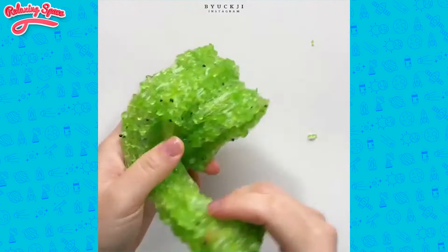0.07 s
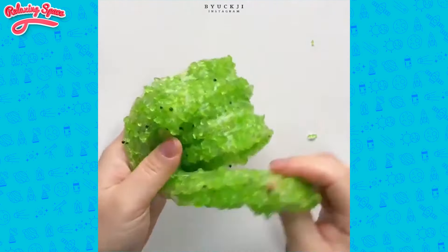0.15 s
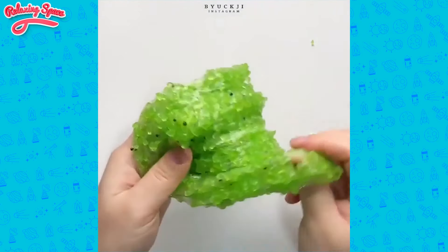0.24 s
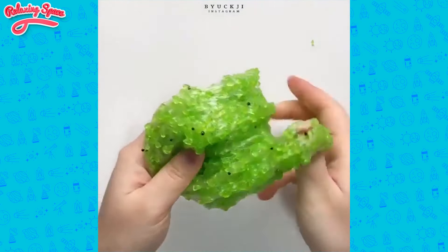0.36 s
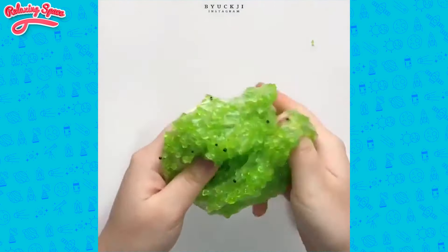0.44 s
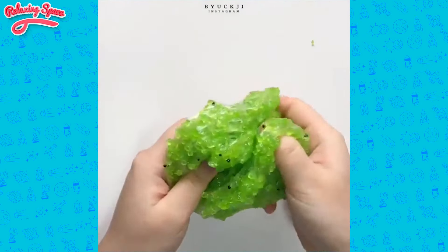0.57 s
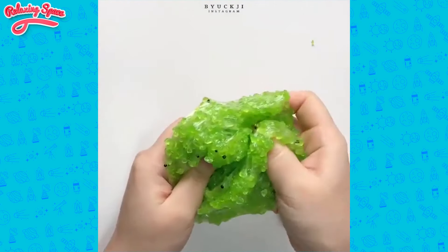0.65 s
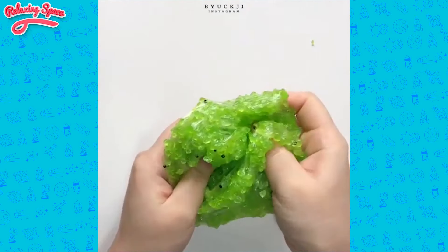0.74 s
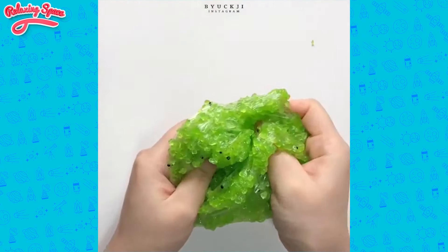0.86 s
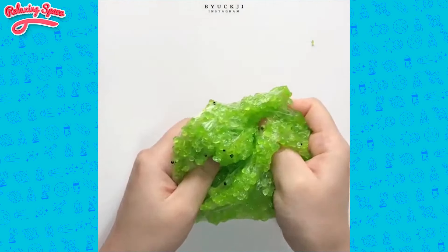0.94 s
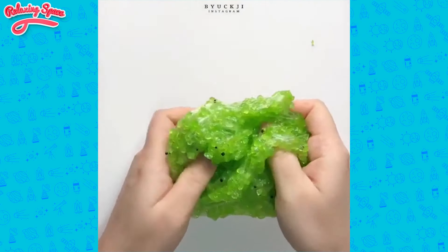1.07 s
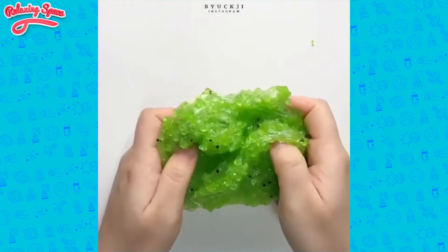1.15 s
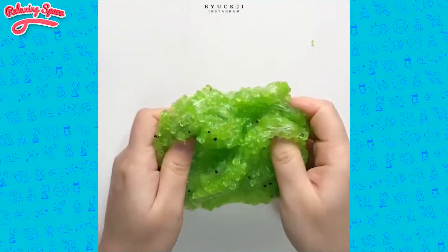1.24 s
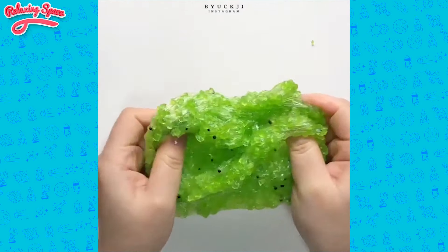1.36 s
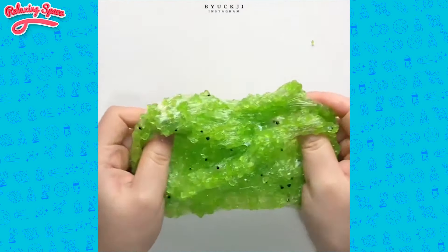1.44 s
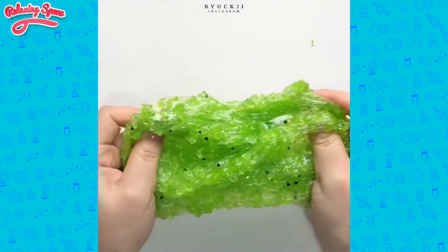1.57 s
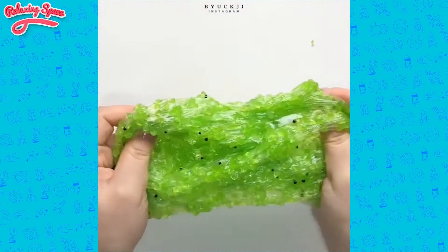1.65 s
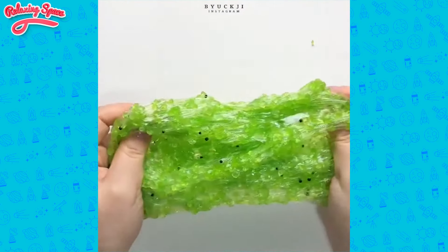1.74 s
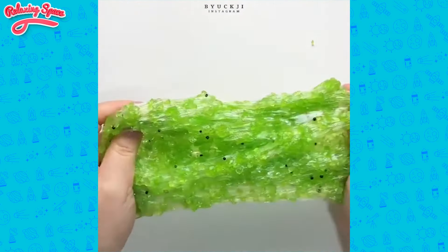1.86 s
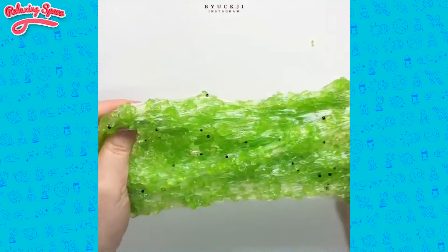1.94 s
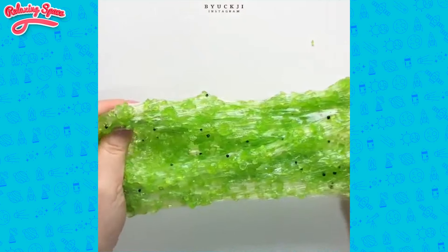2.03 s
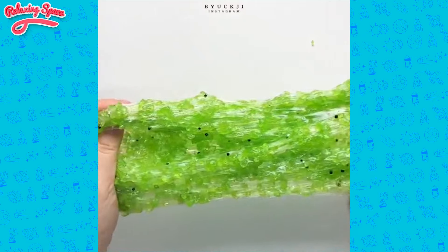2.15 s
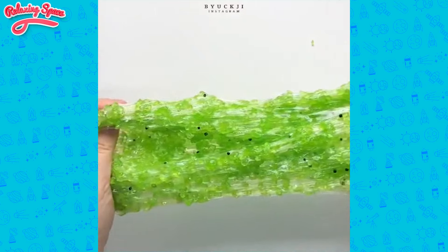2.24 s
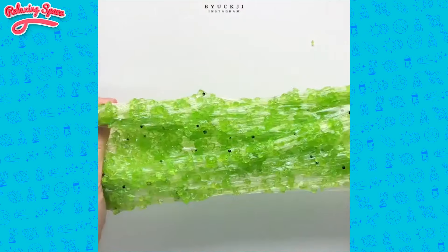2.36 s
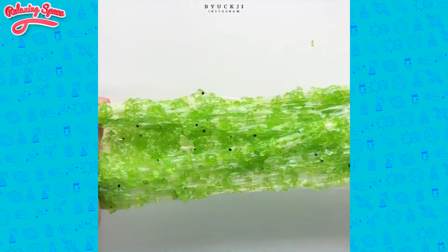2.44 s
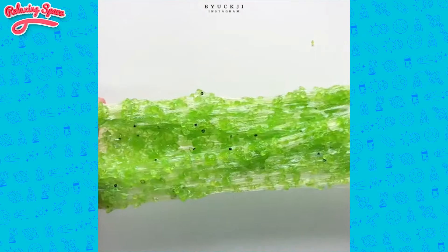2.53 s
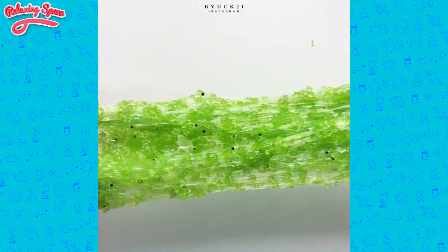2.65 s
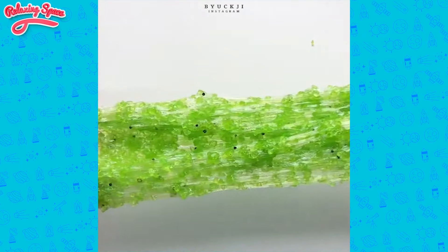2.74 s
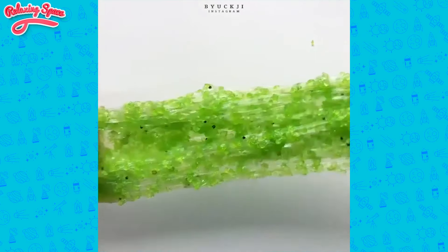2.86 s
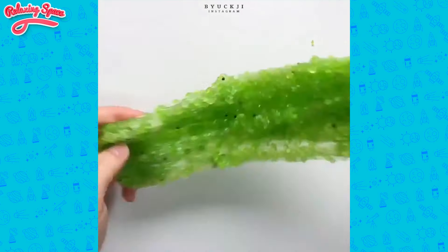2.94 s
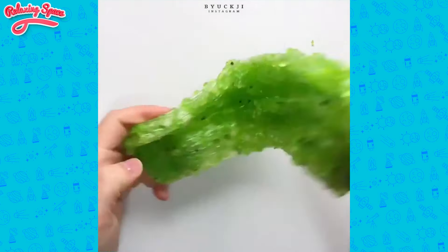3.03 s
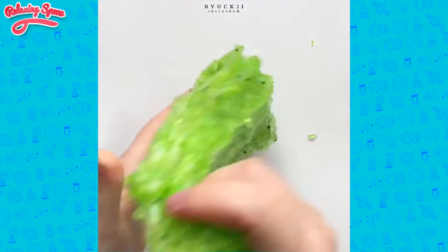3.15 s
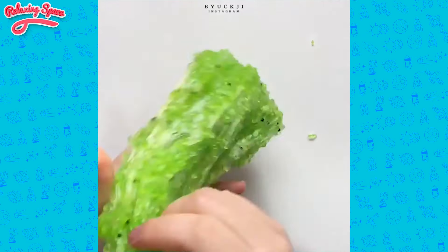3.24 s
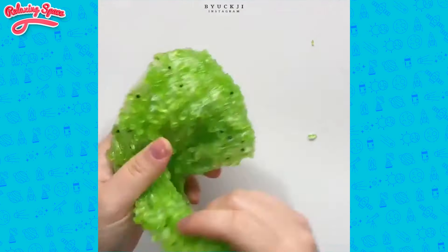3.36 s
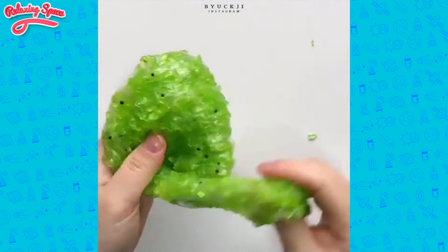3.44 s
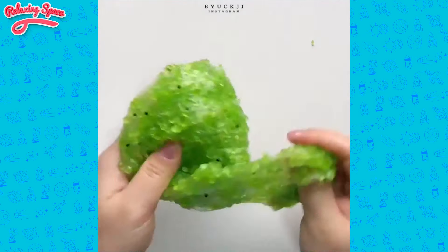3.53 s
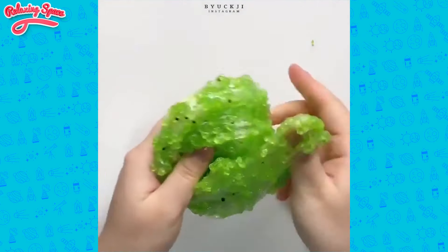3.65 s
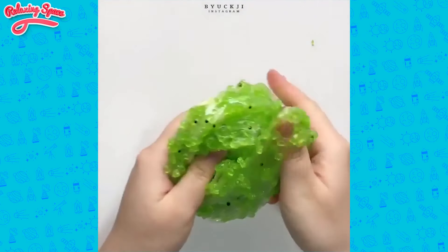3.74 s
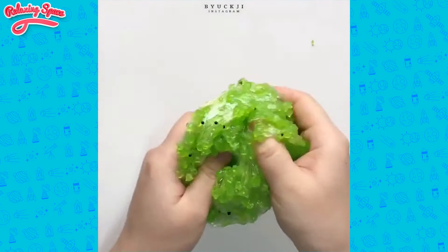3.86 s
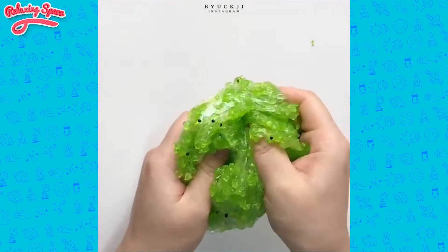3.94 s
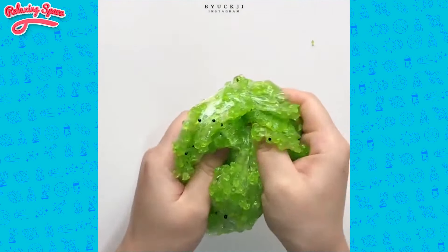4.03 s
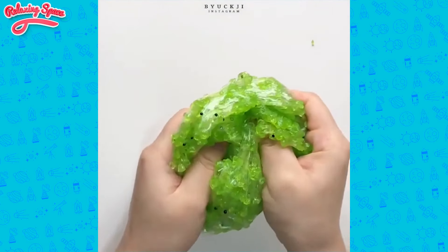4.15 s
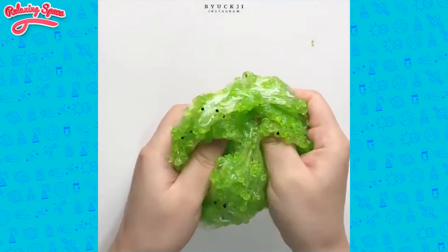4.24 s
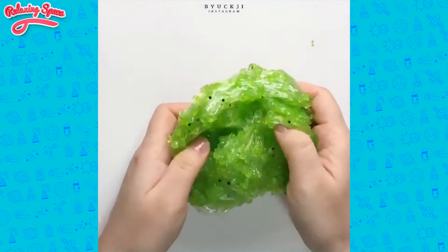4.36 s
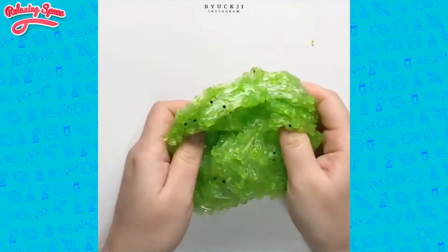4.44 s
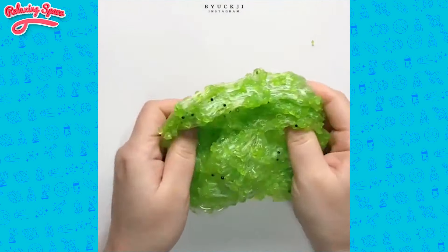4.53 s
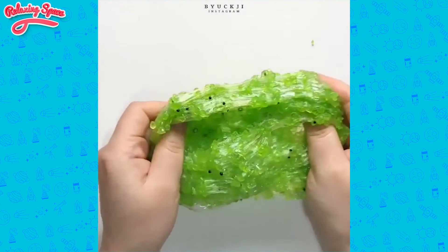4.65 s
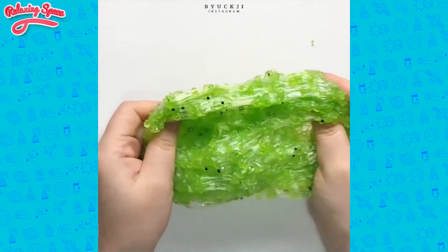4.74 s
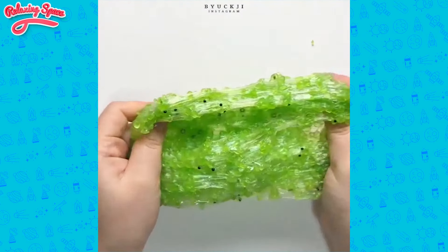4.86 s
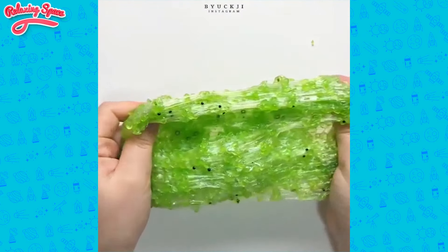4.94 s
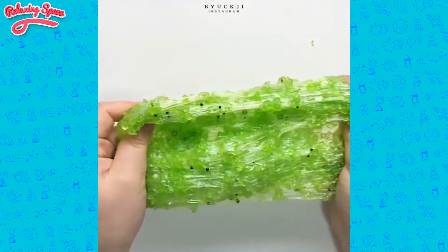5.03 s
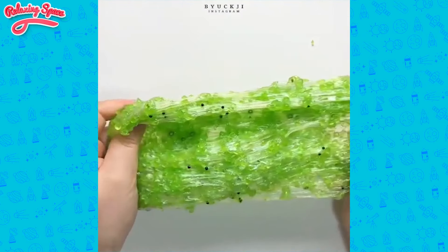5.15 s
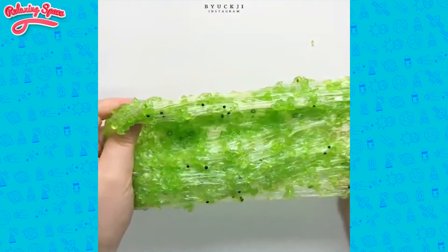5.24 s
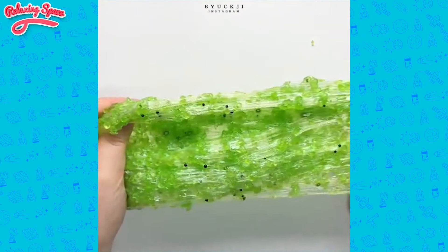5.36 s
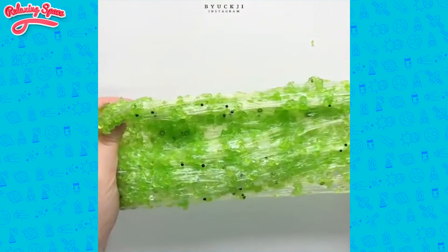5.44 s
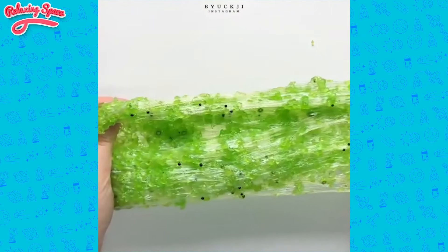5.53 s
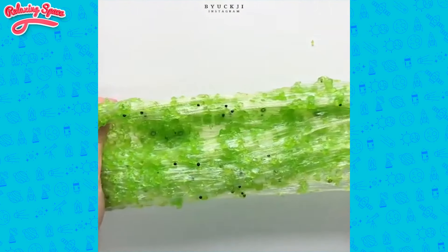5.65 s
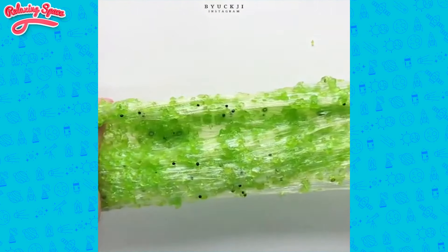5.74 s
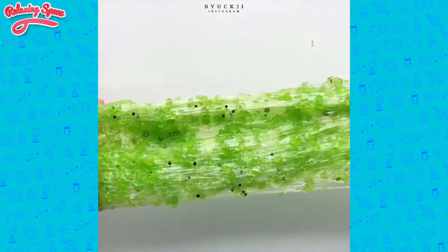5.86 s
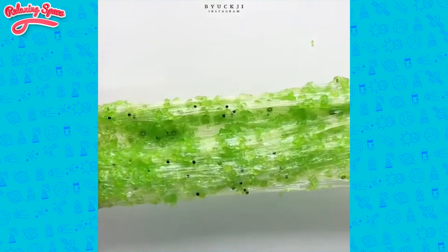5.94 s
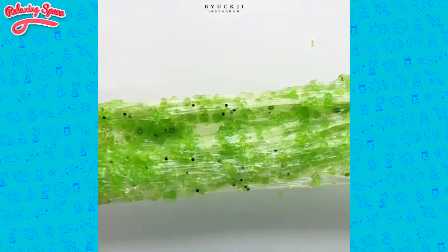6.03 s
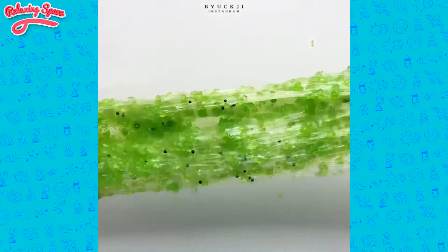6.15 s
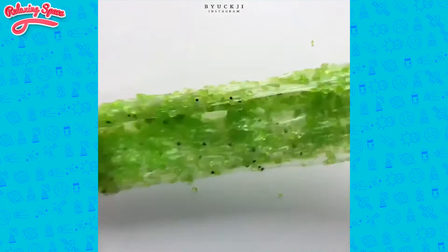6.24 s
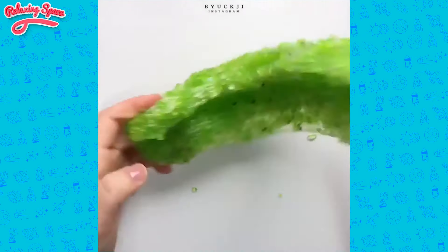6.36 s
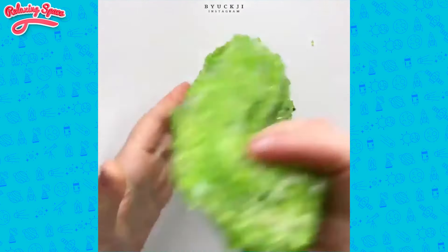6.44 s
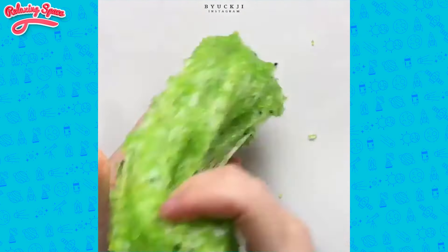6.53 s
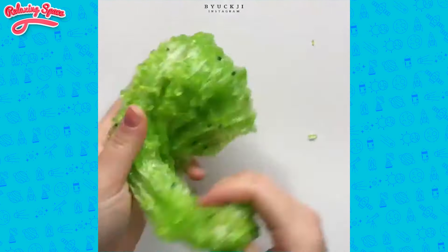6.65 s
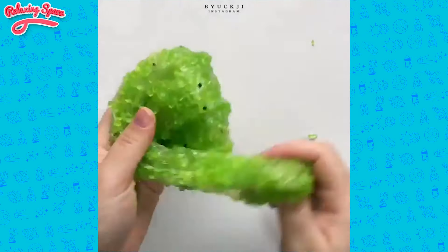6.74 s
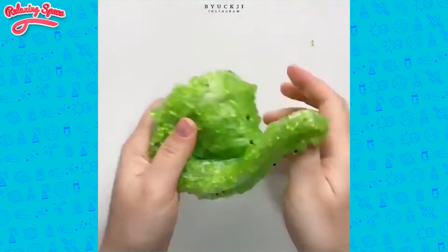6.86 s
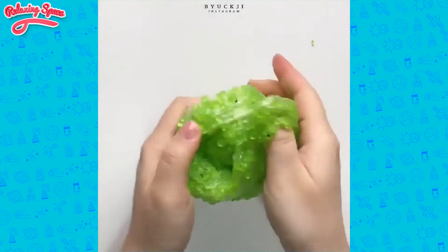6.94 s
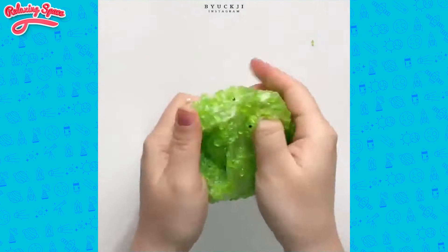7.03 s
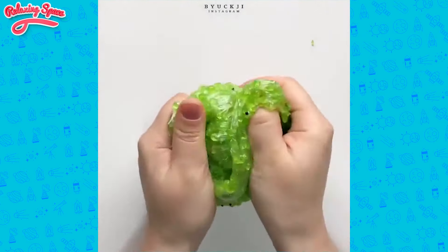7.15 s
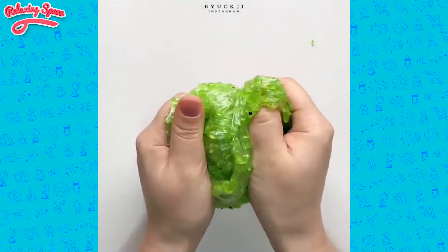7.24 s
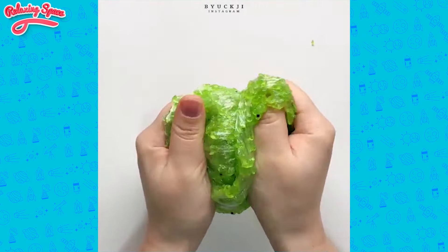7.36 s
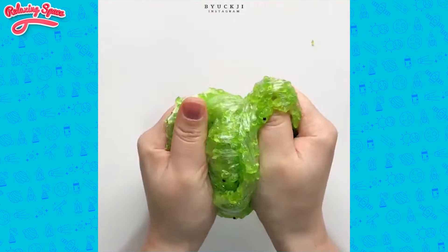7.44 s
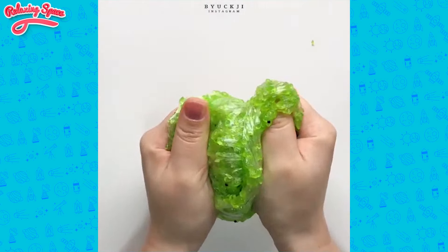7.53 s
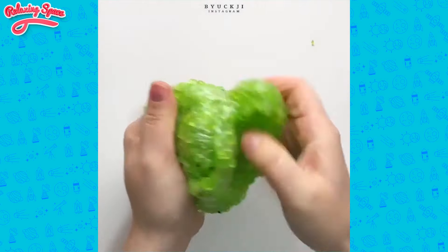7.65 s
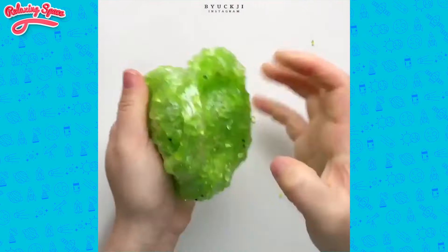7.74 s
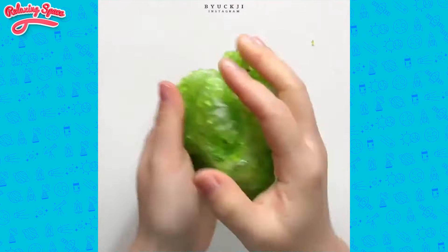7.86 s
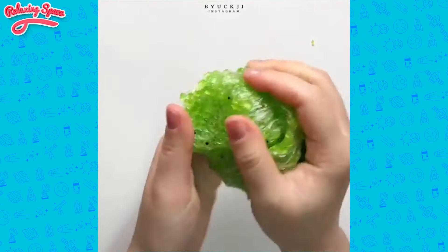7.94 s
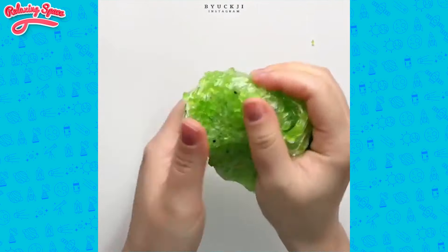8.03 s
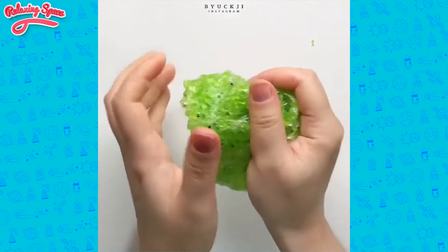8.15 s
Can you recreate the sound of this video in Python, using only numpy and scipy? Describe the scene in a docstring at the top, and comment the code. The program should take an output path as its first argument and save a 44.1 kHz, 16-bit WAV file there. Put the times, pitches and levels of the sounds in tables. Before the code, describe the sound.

Very close to the microphone in a small furnished room, hands fold and squeeze beady slime. Dense wet crackle and crisp ticks swell with each squeeze, thin out through long stretches, then return. Hollow pops burst around one, four and seven and a half seconds, the loudest slightly overloaded. Dull squelching lies under the presses, with faint low room noise and hum.

```python
"""Small furnished room, close above a table: two hands fold, squeeze and stretch a lump of bead-filled slime.
Air cells and sticky threads snap as dense coloured clicks, dull when deep in the lump; gestures set their level.
Single pops and crisp ticks stand out, faint to very loud: short cavity rings with a film crack and a thud.
Trapped air sputters out of folds as runs of clicks through two resonances. Table and room add noise echoes.
Room noise and mains hum lie beneath; the loudest pops overload the microphone."""
import sys
import numpy as np
from scipy import signal
from scipy.fft import rfft, irfft, next_fast_len
from scipy.io import wavfile
from scipy.ndimage import uniform_filter1d

SR = 44100
rng = np.random.default_rng(int(sys.argv[2]) if len(sys.argv) > 2 else 0)


def wav_out(sig):
    """Save sig, one row per channel (or a flat mono array), as 16-bit PCM at SR to the path in sys.argv[1]."""
    wavfile.write(sys.argv[1], SR, np.round(np.clip(np.atleast_2d(sig).T, -1, 1) * 32767).astype(np.int16))


N = 361179
TIME = np.arange(N) / SR


def from_db(db):
    """dB to amplitude ratio."""
    return 10 ** (np.asarray(db) / 20)


def rms_one(x):
    """Scale to rms 1."""
    return x / np.sqrt(np.mean(x ** 2) + 1e-20)


def unit_energy(x):
    """Scale to a sum of squares of 1."""
    return x / np.sqrt(np.sum(x ** 2) + 1e-20)


def add(out, start_s, sound):
    """Mix a sound into out, cut at the end."""
    start = max(round(start_s * SR), 0)
    out[start:start + len(sound)] += sound[:N - start]


def drift(corner_hz):
    """Random wander with spread near 1: noise through two equal low-pass poles, run at SR / 40."""
    step, settle = 40, 2000
    r = np.exp(-2 * np.pi * corner_hz * step / SR)
    white = rng.standard_normal(N // step + settle + 2)
    slow = rms_one(signal.lfilter([1], [1, -2 * r, r * r], white)[settle:])
    return np.interp(np.arange(N) / step, np.arange(len(slow)), slow)


def colour(spectrum, size):
    """Spectrum level in dB, linear over log frequency, on an FFT grid; and that grid in Hz, raised by 1 Hz."""
    points = np.array(spectrum)
    hz = np.arange(size // 2 + 1) * SR / size + 1
    return np.interp(np.log(hz), np.log(points[:, 0]), points[:, 1]), hz


def noise(spectrum, size):
    """Random-phase noise with a given colour, rms 1."""
    db, hz = colour(spectrum, size)
    phase = 2 * np.pi * rng.random(len(hz))
    return rms_one(irfft(from_db(db) * np.exp(1j * phase), size))


def click(spectrum, tint_db=0, turn=0, size=1024):
    """Minimum-phase pulse of a given colour, the most sudden one; a tint ripples it every two octaves."""
    db, hz = colour(spectrum, size)
    db = db + tint_db * np.cos(2 * np.pi * (np.log2(hz) / 2 + turn))
    cepstrum = irfft(np.log(from_db(db)))[:size // 2]
    cepstrum[1:] *= 2
    return irfft(np.exp(rfft(cepstrum, size)))[:size // 2]


def snap(pulse, length_s, direct, size=1024):
    """Sharp first break (energy share direct), then decaying scatter from film, beads and palms; energy 1."""
    scatter = rng.standard_normal(size) * np.exp(-(TIME[:size] / length_s) ** 1.36)
    first = unit_energy(np.pad(pulse, (0, size - 1)))
    rest = unit_energy(signal.fftconvolve(pulse, scatter))
    return unit_energy(np.sqrt(direct) * first + np.sqrt(1 - direct) * rest)


def resonate(x, hz, width_hz):
    """Air cavity: one two-pole resonance."""
    r = np.exp(-np.pi * width_hz / SR)
    return signal.lfilter([1 - r, 0, r - 1], [1, -2 * r * np.cos(2 * np.pi * hz / SR), r * r], x)


def tiny_snaps(per_s, spread_db, clump_db, evenness_s):
    """Random-sign clicks of uneven, wandering size, divided by their local rms over about evenness_s."""
    born = rng.random(N) < per_s / SR
    sizes = from_db(spread_db * np.minimum(rng.exponential(1, N), 4.5) + clump_db * drift(66))
    clicks = born * sizes * rng.choice([-1, 1], N)
    window = max(int(evenness_s * SR), 2)
    power = uniform_filter1d(uniform_filter1d(clicks ** 2, window), window)
    return clicks / np.sqrt(np.abs(power) + 1e-6)


# room noise colour: [f/Hz, relative level/dB]
ROOM_COLOUR = [(20, -20), (35, -25), (55, 3), (90, -4), (150, -1), (250, -9.5), (450, -14), (1000, -16),
               (3000, -22), (12000, -29)]
# mains hum partials: [f/Hz, rms level/dB]
HUM_PARTIALS = [(59.2, -61), (119.2, -57)]
ROOM_RMS_DB = -45.5


def background():
    """Low coloured room noise plus steady mains hum sines."""
    out = from_db(ROOM_RMS_DB) * noise(ROOM_COLOUR, next_fast_len(N))[:N]
    for hz, db in HUM_PARTIALS:
        out += from_db(db) * np.sqrt(2) * np.sin(2 * np.pi * (hz * TIME + rng.random()))
    return out


def reflections(x, t60_s, wet_db, size=12288):
    """Slightly dull noise echoes: build-up over a few ms, then exponential decay."""
    t = TIME[:size]
    walls = noise([(100, -2), (1200, -4), (5000, -7), (12000, -7)], size)  # f/Hz, level/dB
    tail = walls * from_db(-60 * t / t60_s) * (1 - np.exp(-t / 0.0024))
    return from_db(wet_db) * signal.oaconvolve(x, unit_energy(tail))[:N]


FADE_DB = 20  # level change over one attack or release time


def swell(peak_s, attack_s, hold_s, release_s):
    """Gesture envelope in dB re its peak: linear dB rise, hold, linear dB fall."""
    before_s = np.maximum(peak_s - TIME, 0)
    after_s = np.maximum(TIME - peak_s - hold_s, 0)
    return -FADE_DB * (before_s / attack_s + after_s / release_s)


# fold, grip, press, pull, sag, gather, loosen, peel:
# [peak t/s, attack/s, release/s, wet crackle level/dB, crisp level re wet/dB, squelch level/dB]
MOVES = [(0.27, 0.35, 1, -36, 2, -68), (1.21, 0.31, 0.17, -36.5, 3.5, -46.5),
         (2.42, 0.039, .2, -41, 1, -56), (2.94, 0.31, 0.9, -40.5, 0, -66),
         (3.044, 0.052, 0.08, -40.5, 11.5, -58), (3.56, 0.18, 0.68, -36, 0, -51),
         (4.171, 0.068, 0.13, -24.5, -2.5, -37), (4.425, .17, 0.11, -29.5, 2.5, -40.5),
         (5.72, 0.41, 1, -42, -21, -66), (6.26, 0.22, 0.21, -39, 0.5, -45),
         (6.38, 0.13, 0.099, -35.5, 3.5, -59), (6.892, 0.37, 0.26, -38, 2.5, -48.5),
         (7.05, 0.072, 0.12, -40, 2, -60), (7.68, 0.14, 0.077, -30.5, 3.5, -41),
         (7.823, 0.1, 0.033, -22, 1, -32.5), (8.128, 0.29, 0.49, -31, 4, -40.5)]
# both thumbs sink into the lump:
# [peak t/s, hold/s, release/s, wet crackle level/dB, crisp level re wet/dB, squelch level/dB]
SQUEEZES = [(0.766, 0.13, 0.48, -27.5, 0, -43), (4.007, 0.21, .07, -28, -1, -37.5),
            (7.324, 0.15, 0.38, -26.5, 0.5, -35.5)]
# lump pulled into a thinning sheet, crackle fading over the release; columns as SQUEEZES
STRETCHES = [(1.442, 0.19, 1.055, -31.5, -1, -48.5), (4.655, 0.079, 1.49, -31, -0.5, -50.5)]
SQUEEZE_ATTACK_S, STRETCH_ATTACK_S = 0.25, 0.28
IDLE_WET_DB, IDLE_CRISP_RE_WET_DB, IDLE_SQUELCH_DB = -57, 3.5, -58.5  # sticky slime keeps ticking


def effort():
    """Hand work: gesture powers add to the idle power; returns wet, crisp and squelch control levels in dB."""
    gestures = [(s, attack, 0, *rest) for s, attack, *rest in MOVES]
    gestures += [(s, SQUEEZE_ATTACK_S, *rest) for s, *rest in SQUEEZES]
    gestures += [(s, STRETCH_ATTACK_S, *rest) for s, *rest in STRETCHES]
    power = from_db([[IDLE_WET_DB], [IDLE_WET_DB + IDLE_CRISP_RE_WET_DB], [IDLE_SQUELCH_DB]]) ** 2
    for peak_s, attack_s, hold_s, release_s, wet_db, crisp_db, squelch_db in gestures:
        peaks = from_db([[wet_db], [wet_db + crisp_db], [squelch_db]])
        envelope = from_db(swell(peak_s, attack_s, hold_s, release_s))
        power = power + (peaks * envelope) ** 2
    return 10 * np.log10(power)


# muffled squelch colour: [f/Hz, relative level/dB]
MUFFLED_COLOUR = [(70, -31.5), (160, -3), (270, 3), (350, -3), (470, -1.5), (600, -11), (900, -2.5),
                  (3000, -51)]


def squelch(level_db):
    """Cells collapsing deep in the pressed lump: clumped clicks through a dull pulse."""
    collapses = from_db(level_db) * tiny_snaps(700, spread_db=1.5, clump_db=3.5, evenness_s=0.021)
    return signal.oaconvolve(collapses, unit_energy(click(MUFFLED_COLOUR)))[:N]


# wet plip colour: [f/Hz, relative level/dB]
WET_COLOUR = [(100, -27.5), (280, -16), (560, -8), (800, -9), (980, -3), (1200, -1), (1750, -5), (2150, -3),
              (2550, -7.5), (3050, -2), (3700, -13.5), (7000, -37.5)]
# crisp tick colour: [f/Hz, relative level/dB]
CRISP_COLOUR = [(800, -83), (2400, -28), (3600, 3.5), (4500, 2.5), (6500, 0.5), (7250, 0.5), (8200, -2.5),
                (10300, -1), (12000, -10)]
CELL_SHARE = 0.45  # share of tick power from cells, the rest from threads


def crackle(wet_db, crisp_db, spots=28):
    """Cells give plip and tick, threads only tick; each spot has its tint; harder work: more, louder snaps."""
    per_s = 850 * from_db(0.55 * (wet_db + 35))
    cells = tiny_snaps(per_s, spread_db=1.5, clump_db=1.2, evenness_s=0.11)
    threads = tiny_snaps(per_s, spread_db=1.0, clump_db=-1.0, evenness_s=0.11)
    plips = from_db(wet_db - 1.27) * cells
    ticks = np.sqrt(CELL_SHARE) * cells + np.sqrt(1 - CELL_SHARE) * threads
    ticks = from_db(crisp_db - 1.46) * ticks
    place = 0.45 * drift(14) + 0.2 * rng.standard_normal(N)  # tearing wanders over the lump
    spot = np.floor(place * spots) % spots
    out = np.zeros(N)
    for k in range(spots):
        plip = snap(click(WET_COLOUR, tint_db=4.5, turn=k / spots), length_s=0.0038, direct=0.44)
        tick = snap(click(CRISP_COLOUR, tint_db=4.5, turn=k / spots), length_s=0.004, direct=0.49)
        out += signal.oaconvolve(plips * (spot == k), plip)[:N]
        out += signal.oaconvolve(ticks * (spot == k), tick)[:N]
    return out


# air through a fold: [t/s, length/s, lower level/dB, lower f/Hz, upper f/Hz, upper level re lower/dB]
FOLD_SPUTTERS = [(1.007, 0.032, -29.5, 846, 2310, 0), (1.034, 0.029, -29.5, 1100, 2180, -3),
                 (1.057, 0.03, -35.5, 1400, 2120, -13), (1.195, 0.035, -39, 1610, 2830, 3),
                 (3.967, 0.0121, -19, 480, 2650, -8), (4.42, 0.024, -42, 1500, 2880, 3),
                 (7.809, 0.023, -41.5, 1310, 3050, 17.5)]


def sputters():
    """Escaping air flaps a wet fold: a brief uneven run of clicks rings two cavities."""
    out = np.zeros(N)
    for start_s, length_s, level_db, low_hz, high_hz, upper_db in FOLD_SPUTTERS:
        size = int(length_s * SR)
        flaps = (rng.random(size) < 1100 / SR) * rng.choice([-1, 1], size)
        flaps = np.pad(flaps * signal.windows.tukey(size, 0.5), (0, size))  # room to ring out
        lower = rms_one(resonate(resonate(flaps, low_hz, width_hz=1800), low_hz, width_hz=1060))
        upper = rms_one(resonate(resonate(flaps, high_hz, width_hz=340), high_hz, width_hz=340))
        # sqrt(2) offsets the padding
        add(out, start_s, from_db(level_db) * np.sqrt(2) * (lower + from_db(upper_db) * upper))
    return out


SMALL_POPS_PER_S, SMALL_OVER_CRACKLE_DB, SMALL_SPREAD_DB = 28, 2, 2.5
SMALL_MAX_DB = -23.5  # small however hard the hands press
SMALL_LOW_HZ, SMALL_HIGH_HZ = 1200, 3000  # before the brightness shift
SMALL_OCTAVES_PER_DB = 0.06  # crisper work bursts smaller, higher pockets
SMALL_CRACK_DB, SMALL_CRACK_SPREAD_DB, SMALL_MEDIAN_TEAR_S = -2, 6, 0.0023


def small_pops(wet_db, crisp_db, count=400):
    """Random small bursts as STANDOUT_POPS rows; level and brightness follow the work of the hands."""
    gap, pitch, size = rng.random((count, 3)).T
    crack, tear = np.clip(rng.standard_normal((count, 2)), -2, 2).T
    start_s = np.cumsum(2 * gap) / SMALL_POPS_PER_S
    around_db = np.interp(start_s, TIME, wet_db)
    bright_db = np.interp(start_s, TIME, crisp_db - wet_db)
    level_db = around_db + SMALL_OVER_CRACKLE_DB + SMALL_SPREAD_DB * (2 * size - 1)
    level_db = np.minimum(level_db, SMALL_MAX_DB)
    hz = SMALL_LOW_HZ * (SMALL_HIGH_HZ / SMALL_LOW_HZ) ** pitch * 2 ** (SMALL_OCTAVES_PER_DB * bright_db)
    crack_db = SMALL_CRACK_DB + SMALL_CRACK_SPREAD_DB * crack + bright_db
    pocket_db = level_db - 10 * np.log10(1 + from_db(crack_db) ** 2)  # pocket and crack share the energy
    tear_s = SMALL_MEDIAN_TEAR_S * np.exp(0.5 * tear)
    rows = np.transpose([start_s, pocket_db, hz, crack_db, tear_s])
    return list(rows[start_s < TIME[-1]])


# single pops and crisp ticks that stand out, from faint to very loud:
# [t/s, pocket level/dB, pocket f/Hz, film crack level re pocket/dB (before a 2.06 dB lift),
# nominal tearing time/s (x0.84 for the pocket, x1.3 for the film)]
STANDOUT_POPS = [(0.2587, -27.5, 2590, 7, .0008), (0.2833, -27, 2670, 6.5, 0.0011),
                 (0.321, -29, 2420, -10, 0.0031), (0.3828, -46.5, 1830, 16.5, 0.00057),
                 (0.3976, -35, 1460, 0, 0.0025), (0.5122, -44, 1540, 13.5, .0037),
                 (0.5592, -30, 3000, 1.5, 0.002), (0.5967, -40.5, 2770, 11, 0.00073),
                 (0.704, -26, 2440, -10, .0076), (0.7093, -17, 3240, 5.5, 0.0032),
                 (0.7358, -27, 1880, 2, 0.002), (0.7849, -9.5, 3230, -6, 0.004),
                 (0.7949, -22, 1840, 6.5, 0.0017), (0.9483, -21, 2360, -2, 0.0011),
                 (0.965, -15.5, 1860, 0, 0.0028), (1.0022, -3.5, 1470, -11, 0.0045),
                 (1.008, -8.5, 1400, -32, 0.0012), (1.362, -28, 2650, -3, 0.017),
                 (1.6298, -37.5, 1840, 9, 0.0012), (1.722, -24, 1710, 6.5, 0.0013),
                 (1.8274, -30, 1230, -20, 0.0039), (2.2254, -29.5, 2410, -4.5, 0.0031),
                 (2.3769, -26, 2920, -2, .0045), (2.7138, -36.5, 1790, -1.5, 0.0026),
                 (2.9747, -44, 1350, 4, .0027), (3.0341, -32, 2380, 2, .0073),
                 (3.0471, -30.5, 2530, -3, 0.0031), (3.1266, -35.5, 2030, -17, .0021),
                 (3.2912, -55.5, 2380, 11.5, .0015), (3.355, -38, 2170, -4, 0.0007),
                 (3.4487, -37, 2230, -15, .0032), (3.809, -19, 3000, -12, 0.0056),
                 (3.8311, -19.5, 2820, -1, 0.0011), (3.8374, -21, 1264, -4, 0.0033),
                 (3.9412, -22.5, 1380, -19, 0.014), (3.9485, -13, 2050, 4.5, 0.0045),
                 (3.9712, -7.5, 1360, -24, 0.0022), (4.0251, -17.5, 2100, -6, 0.0036),
                 (4.0435, -20, 1930, -2.5, 0.0035), (4.134, -20, 2090, 6.5, 0.00098),
                 (4.1513, -17, 1790, 0.5, 0.0026), (4.162, -17, 2790, 0, .002),
                 (4.2413, -22, 1320, 0, 0.0027), (4.8119, -27, 2060, 8.5, 0.0025),
                 (4.9927, -39, 1520, 7, 0.002), (5.045, -37, 1910, .5, 0.0019),
                 (5.0573, -23, 2820, -17, 0.0013), (5.1738, -29.5, 2720, -16, 0.0017),
                 (5.2553, -32, 2770, 1.5, 0.0019), (5.329, -32, 1770, -20, .002),
                 (5.398, -31, 1840, -8, 0.008), (5.4414, -28, 2850, -15, 0.0041),
                 (5.449, -29, 1520, -1.5, 0.0032), (5.7987, -35.5, 1440, -4, 0.0037),
                 (5.8588, -35, 1800, -20, .0044), (6.0444, -30.5, 1210, -2.5, 0.0021),
                 (6.228, -38, 1490, 5, 0.0016), (6.382, -31, 3200, -11, .0031),
                 (6.5268, -28, 2400, 2.5, 0.0037), (6.6134, -33.5, 2280, 4, 0.0047),
                 (6.7953, -26, 3000, -8, 0.0017), (6.8624, -50, 1410, 19.5, .0026),
                 (7.0725, -41.5, 1970, 9, 0.0036), (7.1434, -28, 2330, 2, .0036),
                 (7.1792, -31, 1300, -21, .0037), (7.2117, -14.5, 1450, -2.5, 0.0025),
                 (7.2895, -22.5, 1470, 4, 0.0043), (7.3102, -26, 1880, 2, 0.00066),
                 (7.3395, -15, 1890, 5.5, 0.0021), (7.3509, -16.5, 2760, 0, 0.0066),
                 (7.4003, -9, 1490, 13.5, 0.0013), (7.4072, -27, 2230, 8, 0.0073),
                 (7.4418, -14.5, 1690, -2, 0.0023), (7.4543, -25, 2400, -1, 0.0012),
                 (7.4746, -14, 1970, -0.5, 0.004), (7.505, -19, 1380, -2, 0.0028),
                 (7.569, -22, 1270, -0.5, 0.0047), (7.6048, -24.5, 2300, 0, 0.003),
                 (7.6491, -28.5, 2500, 10.5, 0.0019), (7.6543, -11.5, 1460, -1.5, 0.0041),
                 (7.7069, -20.5, 1260, -3.5, 0.0019), (8.0846, -25.5, 2590, 0.5, 0.0027),
                 (8.123, -21, 3100, -19, 0.0016)]
# tearing film colour: [f/Hz, relative level/dB]
CRACK_COLOUR = [(600, -47), (1800, -27), (3600, 0.5), (4600, 2.5), (7000, 1.5), (9000, 0), (12000, -4)]
# lump thud colour: [f/Hz, relative level/dB]
THUD_COLOUR = [(50, -42), (150, -8), (260, 3), (420, -0.5), (700, -2), (1100, -11.5), (4000, -67)]
# hollow between cupped hands and slime: [f/Hz, width/Hz, level/dB before the broad peak at HOLLOW_HZ]
HOLLOW_MODES = [(1207, 180, 5.5), (1517, 81, 2.5)]
HOLLOW_HZ = 1150
THUD_DB, THUD_DB_PER_OCTAVE = -8.5, 9.5  # re pocket at HOLLOW_HZ; fall with rising pitch


def pops(rows):
    """Burst pocket: film cracks, its air and the hollow of the hands ring briefly, the lump thuds softly."""
    out, film, lump = np.zeros(N), click(CRACK_COLOUR), click(THUD_COLOUR)
    impulse = signal.unit_impulse(len(film))
    modes = np.zeros(len(film))
    for k, (hz, width_hz, db) in enumerate(HOLLOW_MODES):
        modes += (-1) ** k * from_db(db) * resonate(impulse, hz, width_hz)
    hollow = unit_energy(resonate(modes, HOLLOW_HZ, width_hz=2700))
    for start_s, level_db, hz, crack_db, tear_s in rows:
        direct = 0.47 * np.exp(-tear_s / 0.0069)  # quicker tears are spikier
        air = unit_energy(resonate(resonate(impulse, hz, width_hz=1.14 * hz), hz, width_hz=1.02 * hz))
        coupling = from_db(-4.5) * HOLLOW_HZ / hz  # low pockets drive the hollow most
        pocket = snap(air + coupling * hollow, 0.84 * tear_s, direct)
        crack = from_db(crack_db + 2.06) * snap(film, 1.3 * tear_s, direct)
        thud_db = THUD_DB - THUD_DB_PER_OCTAVE * np.log2(hz / HOLLOW_HZ)
        thud = from_db(thud_db) * snap(lump, length_s=0.0028, direct=0.2)
        # pocket level = its energy as rms over 7.9 ms
        add(out, start_s, from_db(level_db) * np.sqrt(0.0079 * SR) * (pocket + crack + thud))
    return out


def scene():
    """Slime with table and room echoes over the background, one channel."""
    wet_db, crisp_db, squelch_db = effort()
    floor = background()
    slime = squelch(squelch_db) + crackle(wet_db, crisp_db) + sputters()
    slime += pops(STANDOUT_POPS + small_pops(wet_db, crisp_db))
    table = reflections(slime, t60_s=0.081, wet_db=-14)
    room = reflections(slime, t60_s=0.25, wet_db=-19)
    return (slime + table + room + floor)[None]


CUTOFF_HZ = 11900


def record(dry):
    """Microphone overload: soft clip toward full scale, then a steep elliptic low-pass."""
    clipped = dry / (1 + dry ** 8) ** (1 / 8)
    low_pass = signal.ellip(10, 0.2, 80, CUTOFF_HZ, fs=SR, output="sos")  # ripple, stopband in dB
    return signal.sosfilt(low_pass, clipped)


dry = scene()
out = record(dry)
wav_out(out)
```